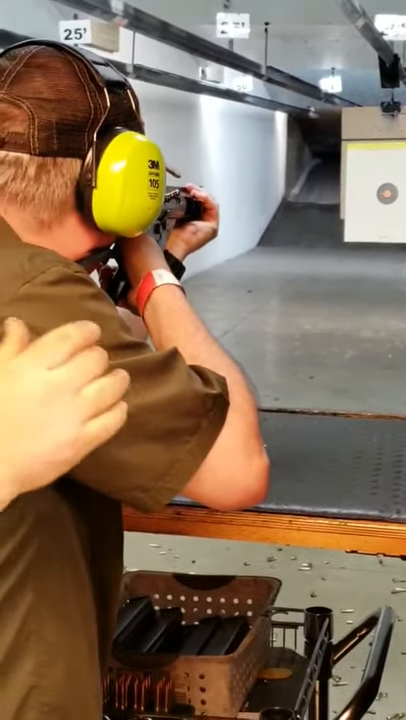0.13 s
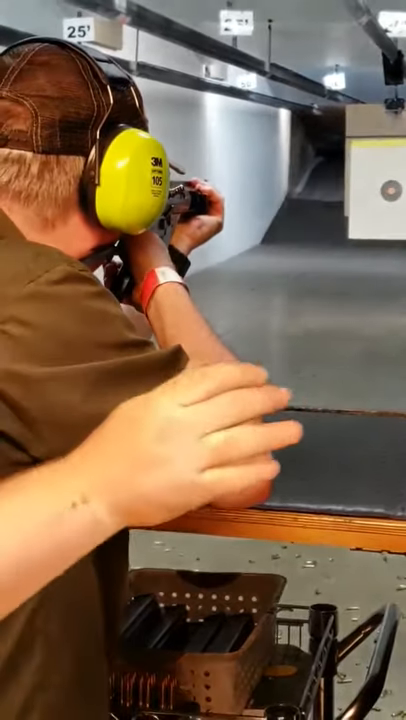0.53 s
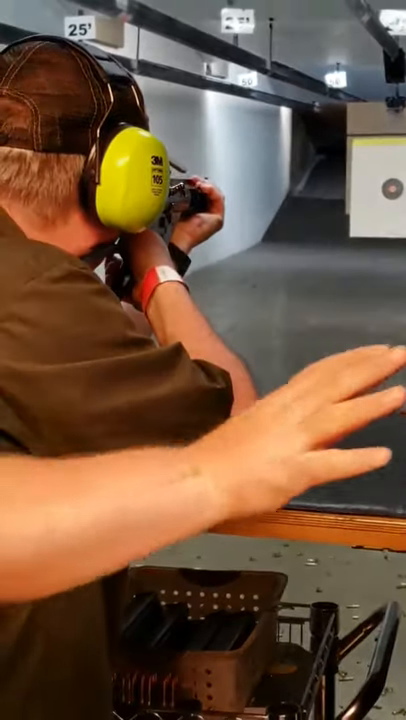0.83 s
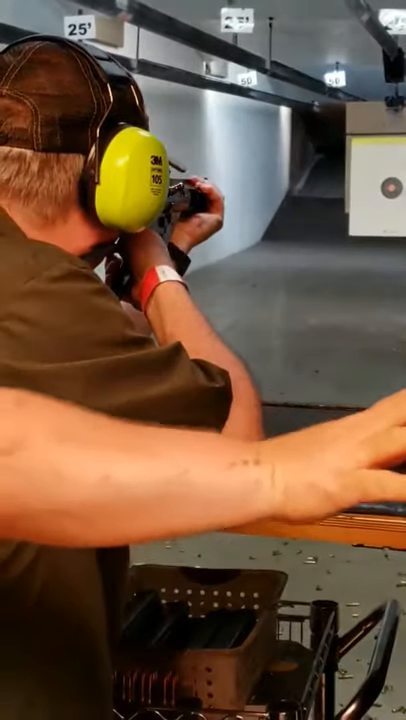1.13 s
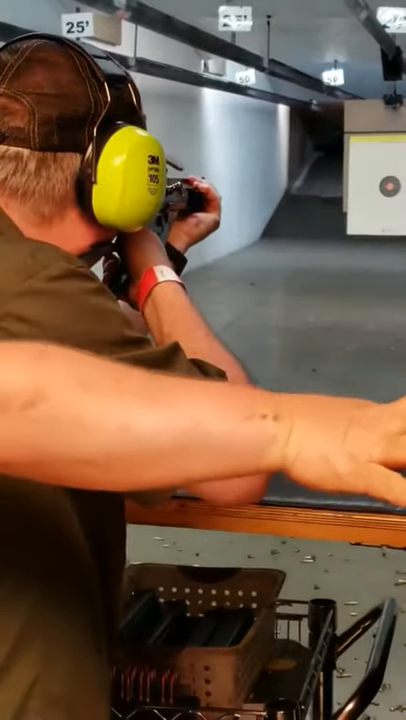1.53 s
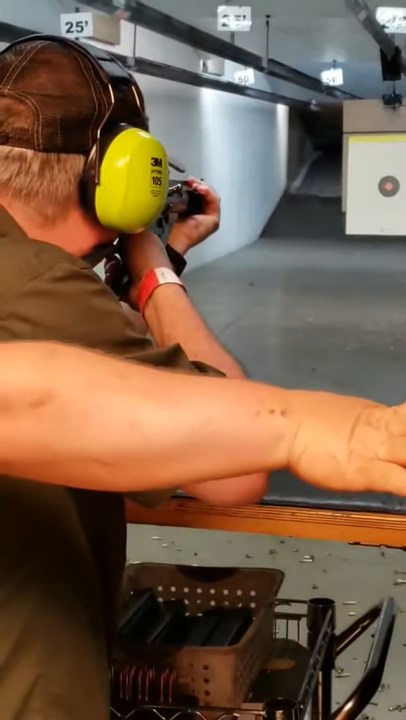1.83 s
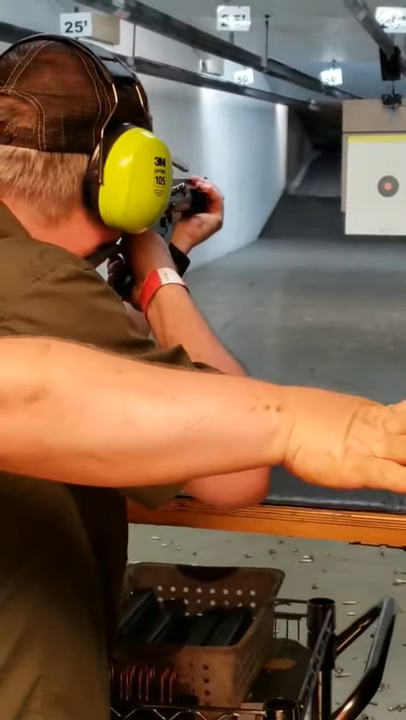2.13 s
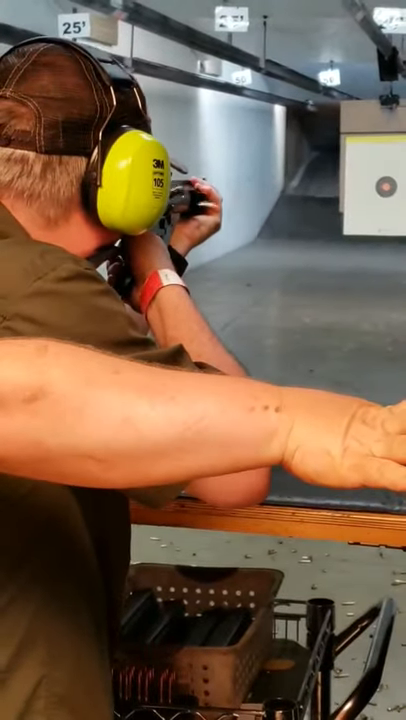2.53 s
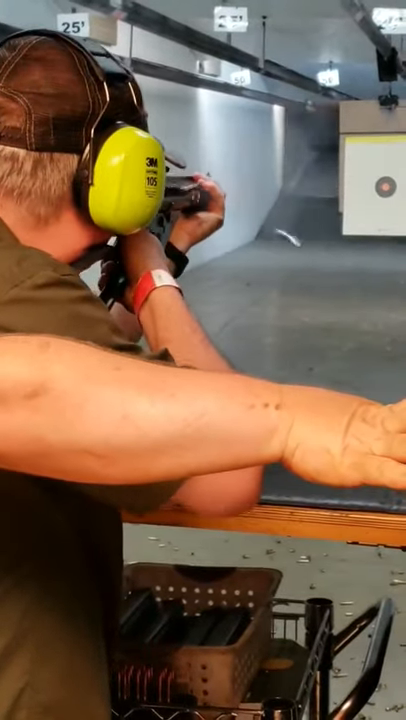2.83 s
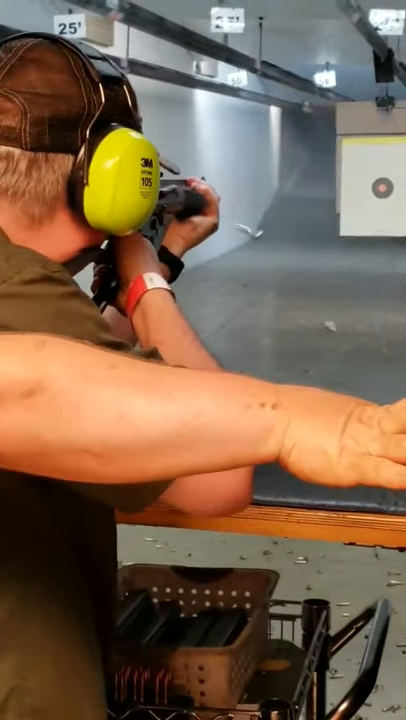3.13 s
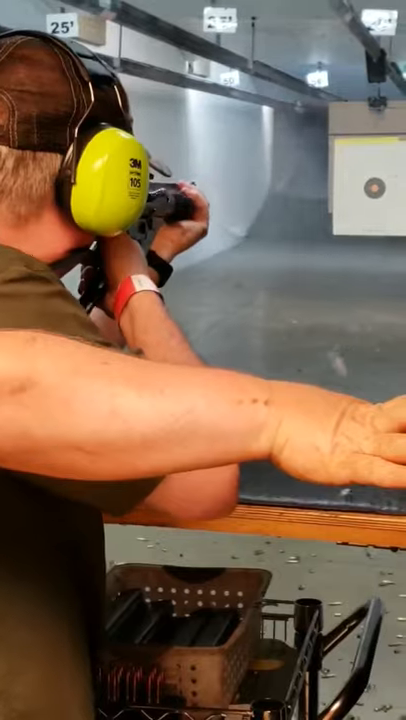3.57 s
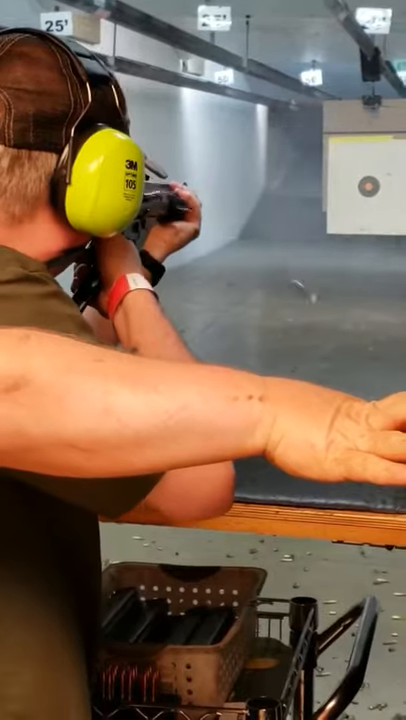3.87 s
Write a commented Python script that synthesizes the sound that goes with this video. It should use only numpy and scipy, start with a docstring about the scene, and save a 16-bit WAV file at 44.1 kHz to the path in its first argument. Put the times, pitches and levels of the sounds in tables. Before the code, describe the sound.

A submachine gun fires a long, rapid, deafening burst inside a concrete indoor shooting range.

```python
"""A submachine gun fires a long burst, nine rounds a second, in a concrete indoor range.
Each blast is shaped noise with ringing steel, followed by a hard slap from downrange, bass echoes
and reverberation that piles up in the hall and overloads the microphone by soft saturation.
Before the burst: three muffled shots through the wall (filtered decaying noise), a brushing sleeve
(noise strokes), knocks and clacks (short noise bands), all over ventilation (steady noise and hum)."""
import sys
import numpy as np
from scipy import signal
from scipy.fft import rfft, irfft
from scipy.io import wavfile
from scipy.ndimage import map_coordinates

SR = 44100
rng = np.random.default_rng(int(sys.argv[2]) if len(sys.argv) > 2 else 0)


def inscribe(sig):
    """Save sig as 16-bit PCM at rate SR to the path in sys.argv[1].

    A 1-D sig is mono; a 2-D sig holds one channel per row.
    Samples are clipped to [-1, 1] before scaling.
    """
    pcm = np.round(np.clip(np.atleast_2d(sig).T, -1, 1) * 32767)
    wavfile.write(sys.argv[1], SR, pcm.astype(np.int16))


N = 176400
T = np.arange(N) / SR  # time axis [s]

# Ventilation: relative noise spectrum (frequency [Hz], density [dB per Hz])
VENT_SPECTRUM = [(15, -63), (25, -17), (43, -17), (96, -4), (113, -6), (177, 3.5), (202, -34), (227, -5),
                 (317, -14.5), (407, -22), (487, -15), (1140, -18.5), (5400, -36.5), (7020, -94),
                 (11900, -120)]
# Left-right likeness of the room's diffuse noise (frequency [Hz], correlation [-1 to 1])
ROOM_LIKENESS = [(60, .95), (150, 0.92), (370, 0.79), (920, 0.031), (2300, -0.4), (5600, 0.26)]
# Hum of the fans (frequency [Hz], rms level [dB])
FAN_HUM = [(59.2, -53), (172.3, -61.5), (409, -61)]
VENT_DB = -46

# Shots beyond the wall (time [s], relative level [dB])
FAR_SHOTS = [(.062, -1), (.945, -2), (1.952, -2)]
# Relative spectrum of the wall's thud (frequency [Hz], density [dB per Hz])
FAR_THUD_SPECTRUM = [(40, -28), (110, -32), (175, -2.5), (240, -7), (295, -0.5), (400, -13), (700, -15.5),
                     (1500, -30.5), (5600, -59)]
# Relative spectrum of the dull reverberation (frequency [Hz], density [dB per Hz])
FAR_WASH_SPECTRUM = [(40, -35), (170, -8.5), (320, -5), (560, -4), (850, -6.5), (1300, -14), (2200, -25.5),
                     (5600, -38)]
# Resonances of the dividing wall (frequency [Hz], width [Hz], lift [dB])
WALL_RESONANCES = [(177, 25, 2), (291, 30, 3), (451, 25, 3.5), (526, 25, 4), (586, 25, 3), (894, 50, 2.5)]
# The wall's ring under each far shot (delay [s], frequency [Hz], glide [Hz/s], length [s], level [dB])
WALL_RINGS = [(.025, 194, 600, 0.023, -39), (0.038, 284, -500, 0.077, -42.5)]
FAR_THUD_DB, FAR_THUD_RISE_S, FAR_THUD_HOLD_S, FAR_THUD_T60_S = -39, 0.013, 0.24, 1.43
FAR_WASH_DB, FAR_WASH_RISE_S, FAR_WASH_HOLD_S, FAR_WASH_T60_S = -38.5, 0.12, 0.066, 1.42

# Sleeve strokes (middle time [s], length [s], level [dB])
SLEEVE_STROKES = [(0.066, 0.043, -51), (0.188, 0.062, -49.5), (0.447, 0.092, -55.5), (0.667, 0.069, -48)]
# Relative spectrum of brushed cloth (frequency [Hz], density [dB per Hz])
CLOTH_SPECTRUM = [(200, -18), (800, 6), (1800, 3.5), (2900, 3), (3800, 0.5), (4700, 2), (5600, -6.5)]
# Metal clacks of the gun (time [s], level [dB], hold [s], decay T60 [s])
CLACKS = [(0.351, -44, 0.016, .09), (2.521, -40, 0.036, .25), (2.557, -23.5, .014, .08)]
# Relative spectrum of the clacks (frequency [Hz], density [dB per Hz])
STEEL_SPECTRUM = [(200, -6.5), (800, -17), (1600, -7.5), (2600, -3.5), (3500, -1.5), (4200, -6), (4900, -2),
                  (5600, -9)]
# Knocks and scuffs around the bench (time [s], frequency [Hz], width [Hz], length [s], level [dB])
KNOCKS = [(.056, 825, 133, 0.023, -37.5), (0.056, 1400, 396, 0.012, -51), (0.193, 1397, 500, 0.03, -48.5),
          (0.359, 297, 60.6, 0.0073, -37), (.38, 175, 40.1, 0.024, -39), (.503, 1464, 300, .008, -56),
          (0.506, 288.6, 79.4, 0.013, -39), (.52, 179, 60.2, 0.0064, -38)]
CLACK_RISE_S = 0.0018
GRIT_DB, GRIT_S = 3.5, 0.002  # random roughness of strokes and clacks: depth, step

# Rounds of the burst; all levels are relative (time [s], blast [dB], blast treble [dB],
# slap delay [s], slap [dB], slap treble [dB], boom [dB], roar [dB])
ROUNDS = [(2.5753, 6, 2.5, 0.044, -12, 21, 3, 4), (2.6860, 5, 3, 0.039, 0, -1, 5, 4),
          (2.7980, -2.5, 1.5, 0.028, 6, -7.5, 2, 4.5), (2.9097, -2, 7, 0.036, 2, 2, 6, 2.5),
          (3.0230, 3, -1, .036, 3, 0, -2, 2.5), (3.1320, 5.5, -7, 0.037, 2, 0, 2.5, -1.5),
          (3.2430, 1.5, 0.5, 0.036, 3, -2.5, 0.5, -0.5), (3.3545, -1, 5, 0.035, 3, -1.5, 1.5, -1),
          (3.4675, 2.5, 3.5, 0.037, 4, -3, -1, -1.5), (3.5760, 2, -2, .040, -0.5, 3, -1.5, 0.5),
          (3.6860, 2, -0.5, 0.037, 3.5, -6, 0, -2.5), (3.7970, 1.5, -3, .039, 6, -2, -4.5, -1.5),
          (3.907, -1.5, -2, 0.04, 1, -1, 0, 3)]
# Relative spectrum of the muzzle blast (frequency [Hz], density [dB per Hz])
BLAST_SPECTRUM = [(25, -7.5), (90, -2.5), (200, 6), (330, -3), (700, 6.5), (1300, -3), (2000, -4.5),
                  (3000, -2.5), (4300, -1), (5600, -5.5)]
# Relative spectrum of the slap from downrange (frequency [Hz], density [dB per Hz])
SLAP_SPECTRUM = [(25, -25), (90, -6), (200, 1), (330, -2), (700, 2.5), (1300, 6), (2000, -3.5), (3000, -4),
                 (4300, -4), (5600, -9)]
# Relative spectrum of the hall's roar (frequency [Hz], density [dB per Hz])
HALL_SPECTRUM = [(25, -11.5), (90, -6), (200, -0.5), (320, -3), (700, 5.5), (1300, -2.5), (2000, -0.5),
                 (3000, -4.5), (4300, -3.5), (5600, -11.5)]
# Resonances of the firing booth (frequency [Hz], width [Hz], lift [dB])
BOOTH_RESONANCES = [(230, 35, 3), (307, 44, 1), (375, 42, 8), (494, 60, -3.5), (555, 48, 4.5),
                    (617, 46, -4), (704, 20, -1), (870, 40, 2.5), (917, 30, 0), (1215, 40, 2.5),
                    (1427, 60, 3.5), (1566, 40, 1.5), (1850, 25, 0), (2270, 19, 2), (3230, 180, -5.5),
                    (4050, 120, -2.5)]
# Left-right likeness of gun reflections and clacks (frequency [Hz], correlation [-1 to 1])
GUN_LIKENESS = [(60, 0.11), (110, 0.48), (200, 0.53), (380, .7), (550, 0.19), (740, 0.84), (1100, -0.33),
                (1400, -0.19), (2200, 0.021), (5600, -0.045)]
# Bass echoes running along the hall (delay [s], frequency [Hz], length [s], relative level [dB])
BOOMS = [(.010, 170, 0.0039, -22.5), (0.027, 218, 0.006, -13.5), (.057, 150, .009, -23.5),
         (.083, 221.5, 0.0038, -21)]
# The gun's steel ringing as the bolt slams (frequency [Hz], level [dB], decay T60 [s])
BOLT_MODES = [(2790, -28, 0.22), (2730, -36, 0.33), (3530, -25.5, 0.18), (4190, -27, 0.067),
              (4110, -35, 0.15), (4830, -21.5, .2)]
BLAST_DB, BLAST_RISE_S, BLAST_HOLD_S, BLAST_T60_S = -11.5, 0.00092, 0.0064, 0.12
SLAP_DB, SLAP_RISE_S, SLAP_HOLD_S, SLAP_T60_S = -13.5, 0.0013, 0.011, 0.12
SLAP_TAIL_DB, SLAP_TAIL_RISE_S, SLAP_TAIL_T60_S = -6.5, 0.046, 0.37  # level relative to the slap
HALL_DB, HALL_RISE_S, HALL_T60_S = -16.5, 0.052, 0.98
BOOM_SPREAD = 0.1  # phase difference between the sides [cycles]
COMMON_SHARE = 0.51  # share of echo power common to all rounds
FLICKER_DB, FLICKER_S = 2, 0.003  # clumping of reflections: depth, step

TREBLE_HZ = 1790  # turnover of the treble shelf
PATCH_DB, PATCH_HZ, PATCH_S = 2.5, 329.8, 0.008  # time-frequency patches: depth, grid steps
COMB_DB, COMB_HZ = 2.5, 44.9  # fine comb: depth, step
EDGE_HZ = 5720  # upper band limit of the microphone
KNEE, CEILING_DB = 4, 0.3  # saturation: sharpness, limit


def amp(db):
    """Level law: decibels to amplitude gain."""
    return 10 ** (np.asarray(db) / 20)


def unit(x):
    """Normalization: scales a signal to an rms of 1."""
    return x / np.sqrt(np.mean(abs(x) ** 2) + 1e-20)


def read(points, hz):
    """Logarithmic pitch scale: interpolates a table along log frequency."""
    f, value = np.transpose(points)
    return np.interp(np.log(hz + 1), np.log(f + 1), value)


def add(mix, s, sound):
    """Superposition: adds a sound to the mix from time s."""
    start = max(round(s * SR), 0)
    part = mix[:, start:][:, :sound.shape[-1]]
    part += sound[..., :part.shape[1]]


def wander(steps):
    """Random modulation: a piecewise-linear curve with one new value per step."""
    return np.interp(steps, np.arange(8192), rng.standard_normal(8192))


def envelope(rise, hold, t60):
    """Reverberant decay: one second of linear rise, hold and exponential fall of 60 dB per t60."""
    t = T[:SR]
    decay_time = np.maximum(t - rise - hold, 0)
    return np.minimum(t / rise, 1) * np.exp(-np.log(1000) * decay_time / t60)


def noise(spectrum, same, size, peaks=()):
    """Diffuse field: stereo noise with a spectrum, left-right correlation and optional resonances."""
    hz = np.fft.rfftfreq(size, 1 / SR)
    mid, side = rfft(rng.standard_normal((2, size)))
    likeness = np.clip(read(same, hz), -1, 1)
    mid = mid * np.sqrt(1 + likeness)
    side = side * np.sqrt(1 - likeness)
    resonance_db = sum(lift / (1 + (2 * (hz - f) / width) ** 2) for f, width, lift in peaks)
    gain = amp(read(spectrum, hz) + resonance_db)
    rolloff = 1 + (hz / EDGE_HZ / 2) ** 20
    return unit(irfft(np.array([mid + side, mid - side]) * gain / rolloff, size))


def ring(at, hz, length, glide=0, spread=0):
    """Wave packet: a Gaussian tone centred on time at, with a phase difference between the sides."""
    t = T[:SR] - at
    side_phase = spread * rng.choice([-0.5, 0.5]) * np.array([[1], [-1]])
    cycles = hz * t + glide * t ** 2 / 2 + rng.random() + side_phase
    return np.exp(-(t / length) ** 2) * np.cos(2 * np.pi * cycles)


def patchy(x, treble_db):
    """Irregular interference: random patches, a treble shelf and a fine comb, strongest in the treble."""
    hz, t, bins = signal.stft(x, SR, nperseg=512, noverlap=384)
    grid = np.meshgrid(hz / PATCH_HZ, t / PATCH_S, indexing="ij")
    field = unit(map_coordinates(rng.standard_normal((128, 128)), grid, order=1, mode="wrap"))
    depth_db = PATCH_DB * 2 * hz[:, None] / (hz[:, None] + TREBLE_HZ)
    patched = signal.istft(bins * amp(depth_db * field), SR, nperseg=512, noverlap=384)[1]
    x = patched[:, :x.shape[1]]

    hz = np.fft.rfftfreq(x.shape[1], 1 / SR)
    shelf = hz ** 2 / (hz ** 2 + TREBLE_HZ ** 2)
    comb_db = COMB_DB * wander(hz / COMB_HZ)
    return irfft(rfft(x) * amp(shelf * (treble_db + comb_db)), x.shape[1])


def ventilation():
    """Stationary noise: a steady air rumble with the sinusoidal hum of the fans."""
    hum = sum(amp(db) * np.sqrt(2) * np.sin(2 * np.pi * (hz * T + rng.random())) for hz, db in FAN_HUM)
    return amp(VENT_DB) * noise(VENT_SPECTRUM, ROOM_LIKENESS, N) + hum


def far_shots():
    """Transmission through a wall: identical shots in the next bay, a thud, then dull reverberation."""
    thud = amp(FAR_THUD_DB) * noise(FAR_THUD_SPECTRUM, ROOM_LIKENESS, SR, WALL_RESONANCES)
    thud = thud * envelope(FAR_THUD_RISE_S, FAR_THUD_HOLD_S, FAR_THUD_T60_S)
    wash = amp(FAR_WASH_DB) * noise(FAR_WASH_SPECTRUM, ROOM_LIKENESS, SR, WALL_RESONANCES)
    wash = wash * envelope(FAR_WASH_RISE_S, FAR_WASH_HOLD_S, FAR_WASH_T60_S)
    wall = sum(amp(db) * ring(at, hz, length, glide) for at, hz, glide, length, db in WALL_RINGS)
    out = np.zeros((2, N))
    for s, db in FAR_SHOTS:
        add(out, s, amp(db) * (thud + wash + wall))
    return out


def sleeve():
    """Friction noise: cloth noise under a Gaussian swell for each stroke."""
    strokes = sum(amp(db) * np.exp(-((T - s) / length) ** 2) for s, length, db in SLEEVE_STROKES)
    return strokes * noise(CLOTH_SPECTRUM, ROOM_LIKENESS, N)


def clacks():
    """Impact of metal: bursts of steel-coloured noise that decay exponentially."""
    out = np.zeros((2, N))
    for s, db, hold, t60 in CLACKS:
        steel = patchy(noise(STEEL_SPECTRUM, GUN_LIKENESS, SR), 0)
        add(out, s, amp(db) * steel * envelope(CLACK_RISE_S, hold, t60))
    return out


def knocks():
    """Narrow-band noise: a randomly modulated carrier under a Gaussian swell for each knock."""
    out = np.zeros((2, N))
    t = T[:SR]
    for s, hz, width, length, db in KNOCKS:
        rattle = unit(wander(t * width) + 1j * wander(t * width))
        tone = np.sqrt(2) * (rattle * np.exp(2j * np.pi * hz * t)).real
        add(out, 0, amp(db) * np.exp(-((t - s) / length) ** 2) * tone)
    return out


def handling():
    """Amplitude modulation: sleeve and clacks share a random grit; the knocks stay without it."""
    grit = amp(GRIT_DB * wander(T / GRIT_S))
    return (sleeve() + clacks()) * grit + knocks()


def action():
    """Modal vibration: the receiver's steel rings briefly as damped sines."""
    t = T[:SR // 2]
    out = np.zeros((2, t.size))
    for hz, db, t60 in BOLT_MODES:
        decay = np.exp(-np.log(1000) * t / t60)
        out += amp(db) * decay * np.sin(2 * np.pi * (hz * t + rng.random((2, 1))))
    return out


def echoes(spectrum, shape, trebles):
    """Reflection density: half a second of clumped echoes per round, partly common, partly new."""
    size = SR // 2
    common = noise(spectrum, GUN_LIKENESS, size, BOOTH_RESONANCES)
    for treble_db in trebles:
        new = noise(spectrum, GUN_LIKENESS, size, BOOTH_RESONANCES)
        cloud = np.sqrt(COMMON_SHARE) * common + np.sqrt(1 - COMMON_SHARE) * new
        clumps = amp(FLICKER_DB * wander(T[:size] / FLICKER_S))
        yield patchy(cloud, treble_db) * clumps * shape[:size]


def booms():
    """Travelling bass waves: short tone packets running along the hall."""
    return sum(amp(db) * ring(at, hz, length, spread=BOOM_SPREAD) for at, hz, length, db in BOOMS)


def burst():
    """Direct sound and reflections: each round sums blast, ringing steel, slap, bass echoes and roar."""
    out = np.zeros((2, N))
    columns = np.transpose(ROUNDS)
    blast_shape = envelope(BLAST_RISE_S, BLAST_HOLD_S, BLAST_T60_S)
    slap_tail = amp(SLAP_TAIL_DB) * envelope(SLAP_TAIL_RISE_S, 0, SLAP_TAIL_T60_S)
    slap_shape = np.hypot(envelope(SLAP_RISE_S, SLAP_HOLD_S, SLAP_T60_S), slap_tail)
    hall_shape = envelope(HALL_RISE_S, 0, HALL_T60_S)
    blasts = echoes(BLAST_SPECTRUM, blast_shape, columns[2])
    slaps = echoes(SLAP_SPECTRUM, slap_shape, columns[5])
    roars = echoes(HALL_SPECTRUM, hall_shape, np.zeros(len(ROUNDS)))
    for one_round, blast, slap, roar in zip(ROUNDS, blasts, slaps, roars):
        s, blast_db, _, delay, slap_db, _, boom_db, roar_db = one_round
        add(out, s, amp(BLAST_DB + blast_db) * blast)
        add(out, s, action())
        add(out, s + delay, amp(SLAP_DB + slap_db) * slap)
        add(out, s, amp(boom_db) * booms())
        add(out, s, amp(HALL_DB + roar_db) * roar)
    return out


def scene():
    """Superposition: the whole range is the sum of its sources."""
    return ventilation() + far_shots() + handling() + burst()


def record(dry):
    """Saturation: a narrow-band microphone rounds off the highest peaks between two steep band limits."""
    lowpass = signal.firwin(401, EDGE_HZ, window=("kaiser", 8), fs=SR)[None]
    x = signal.oaconvolve(dry, lowpass, "same")
    squashed = x / (1 + abs(x / amp(CEILING_DB)) ** KNEE) ** (1 / KNEE)
    return signal.oaconvolve(squashed, lowpass, "same")


dry = scene()
out = record(dry)
inscribe(out)
```